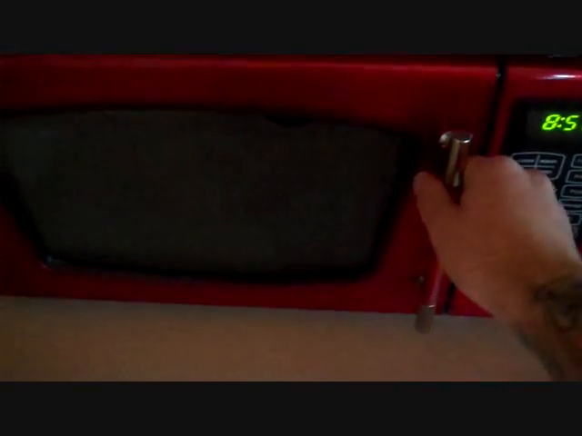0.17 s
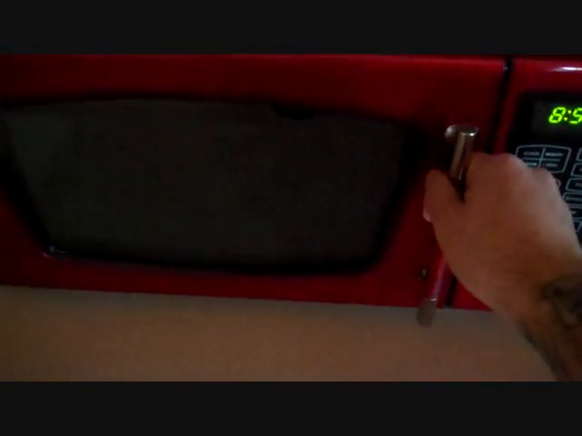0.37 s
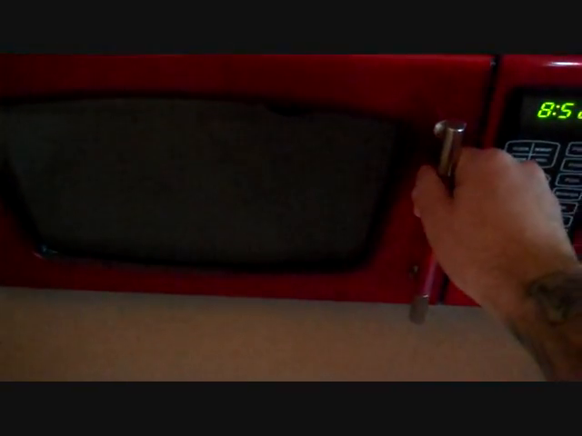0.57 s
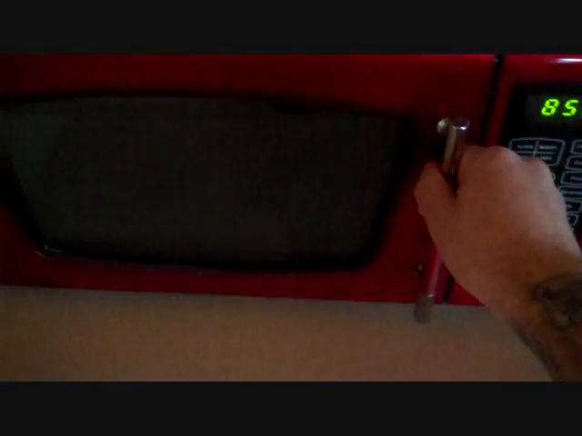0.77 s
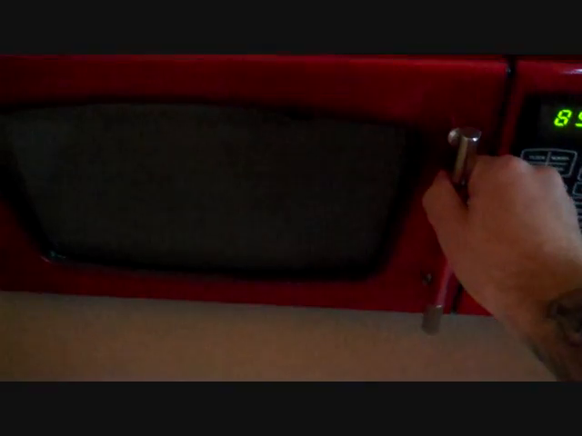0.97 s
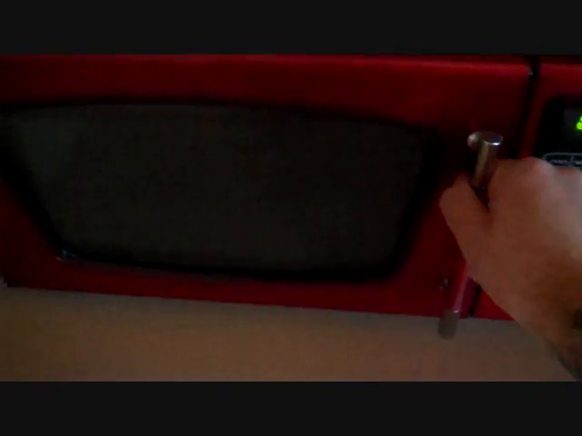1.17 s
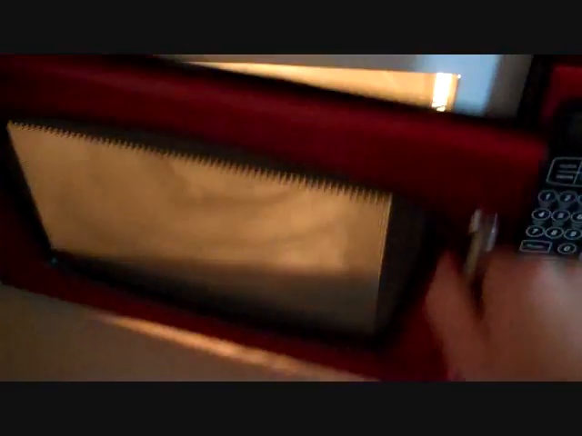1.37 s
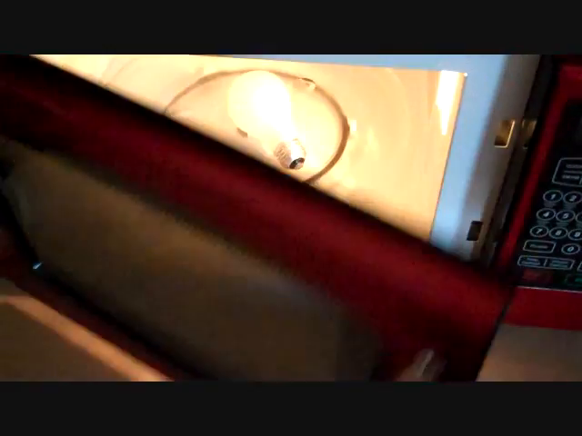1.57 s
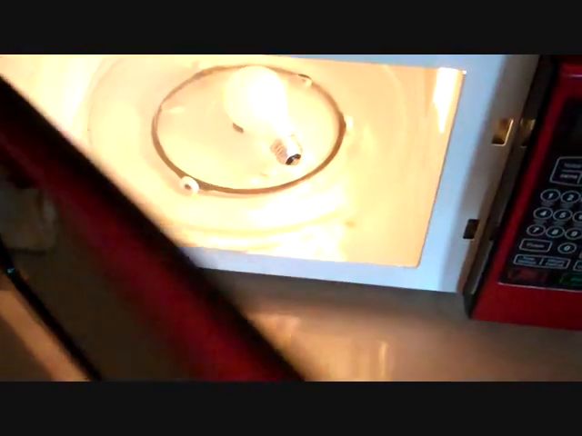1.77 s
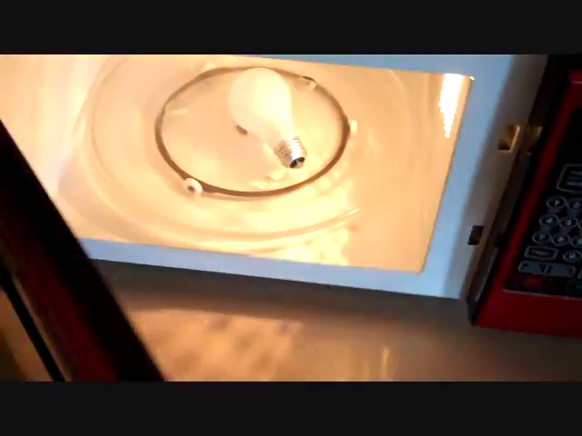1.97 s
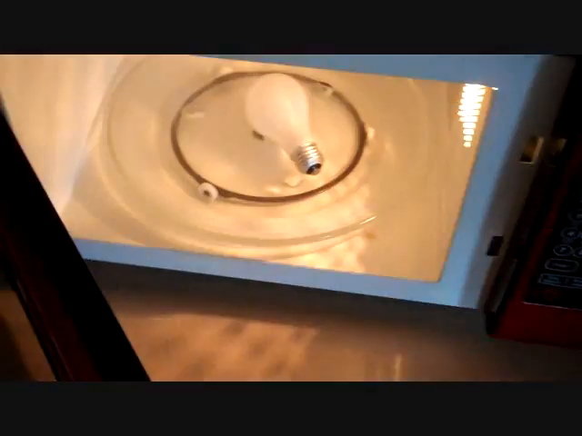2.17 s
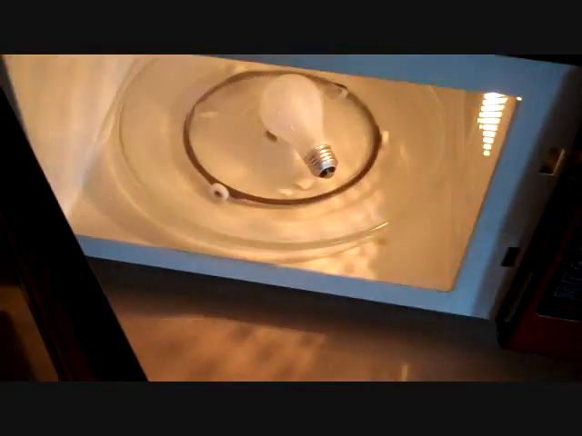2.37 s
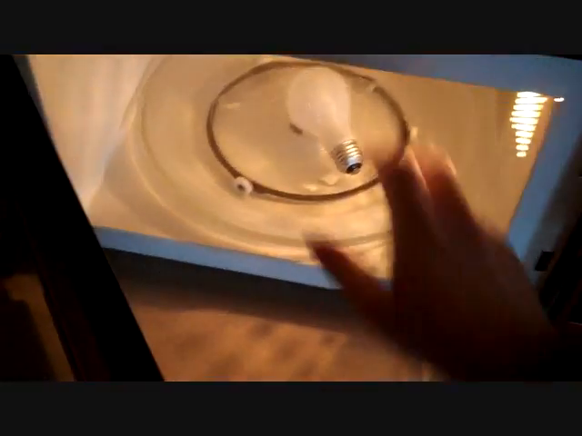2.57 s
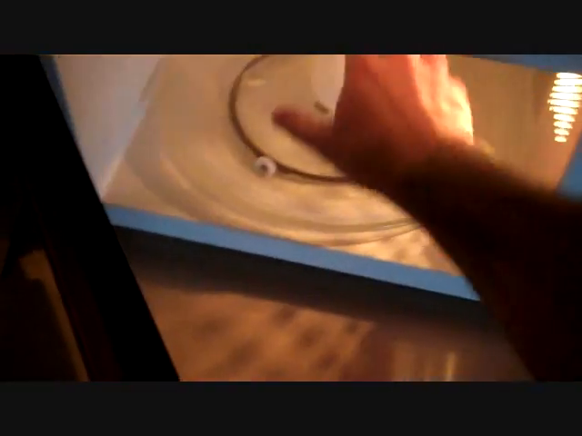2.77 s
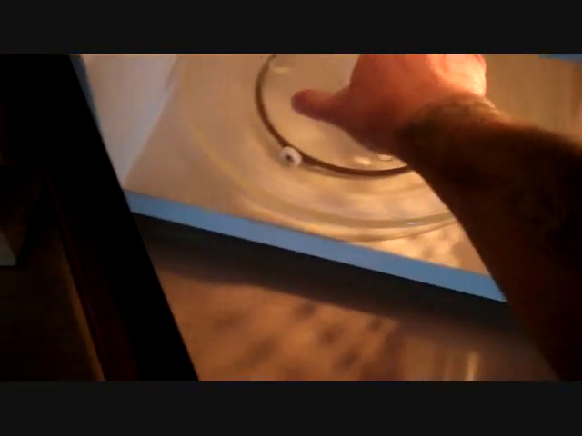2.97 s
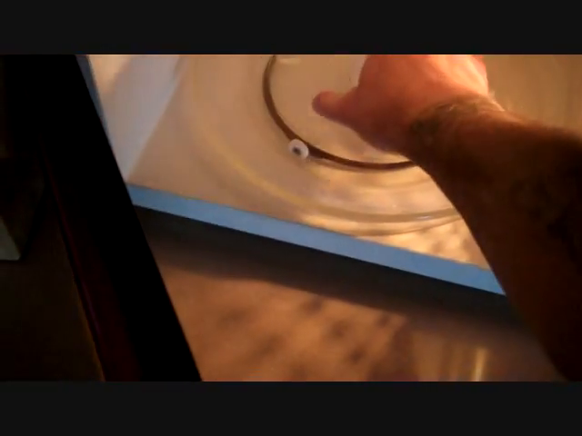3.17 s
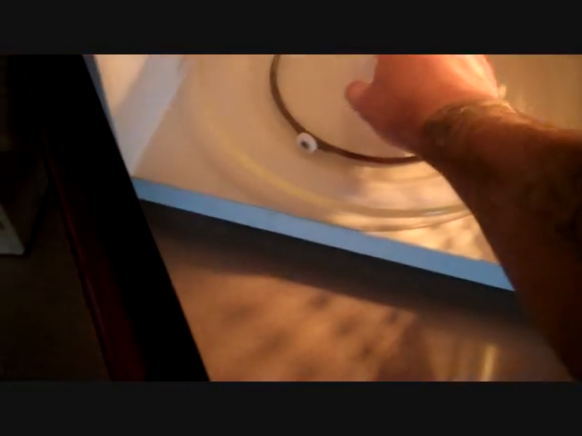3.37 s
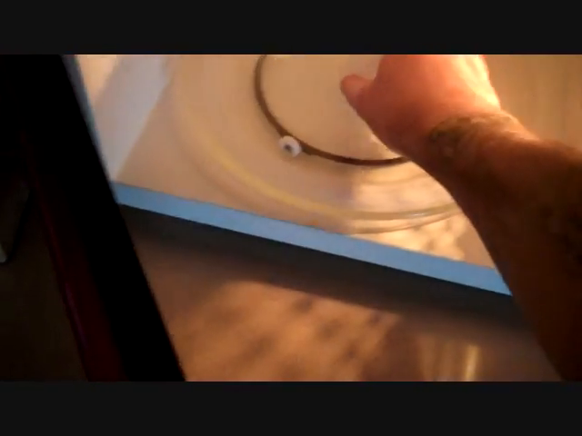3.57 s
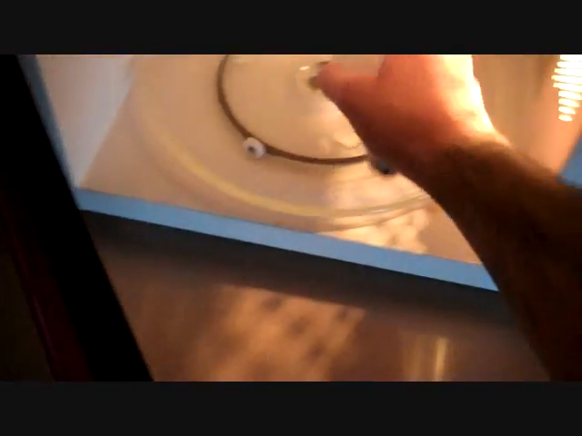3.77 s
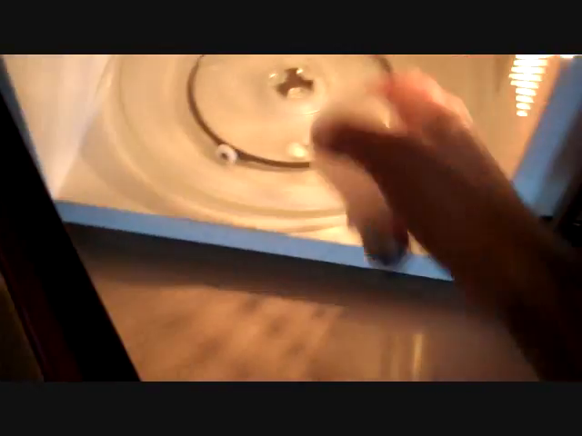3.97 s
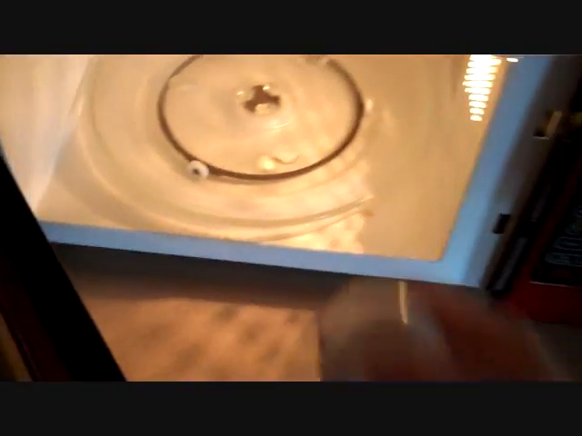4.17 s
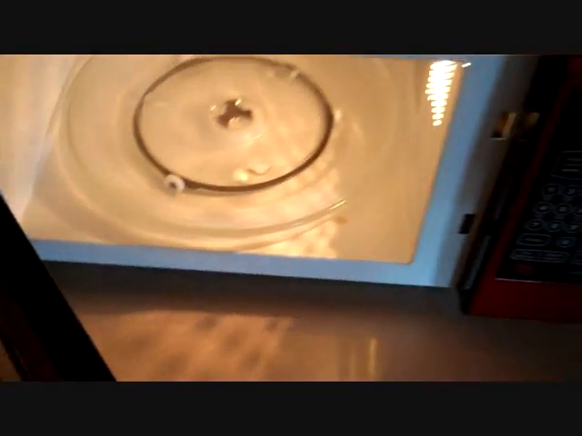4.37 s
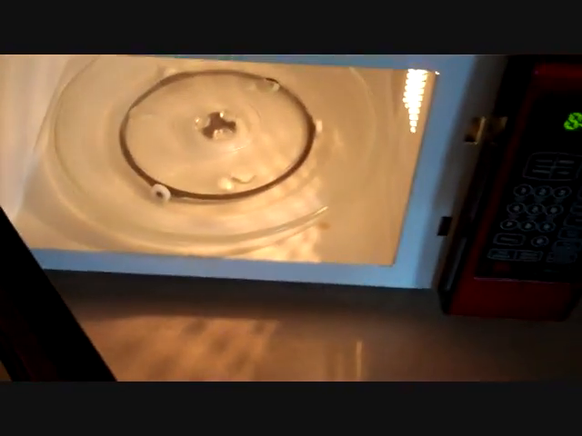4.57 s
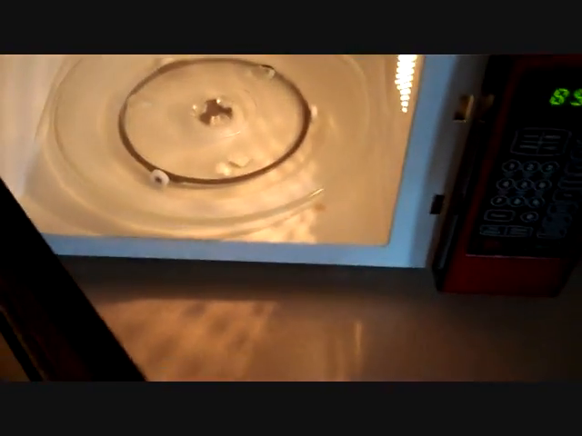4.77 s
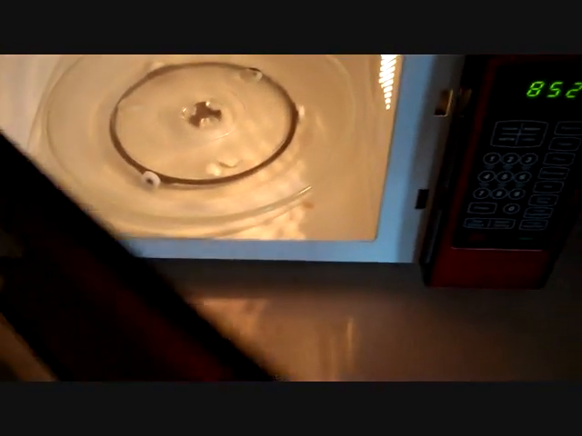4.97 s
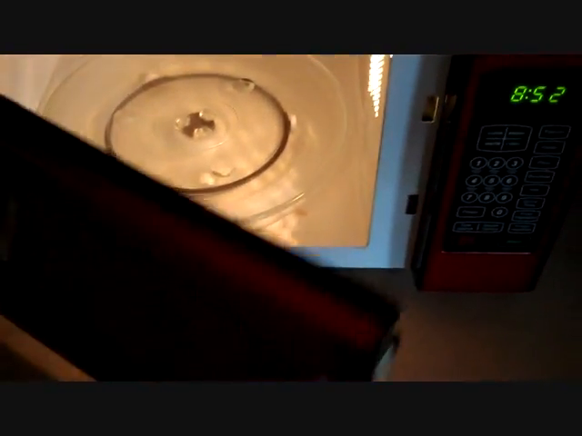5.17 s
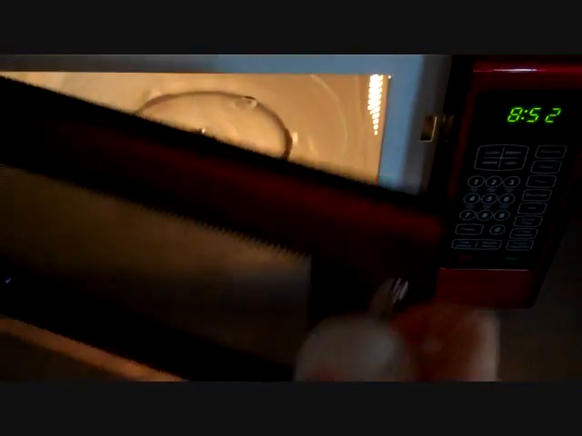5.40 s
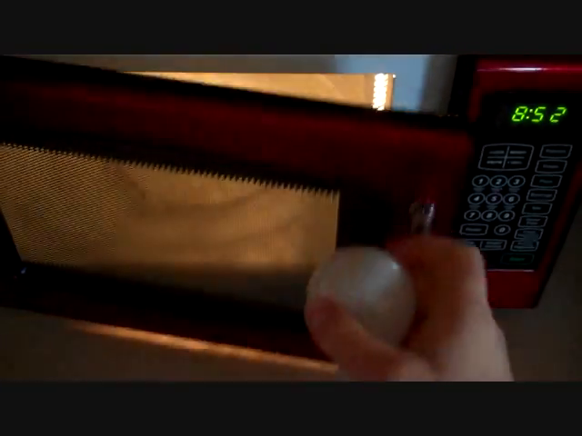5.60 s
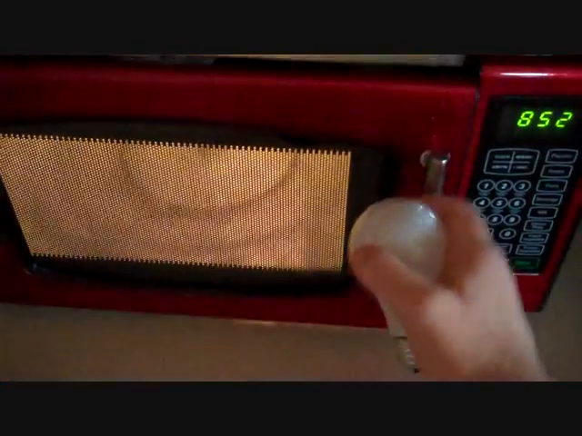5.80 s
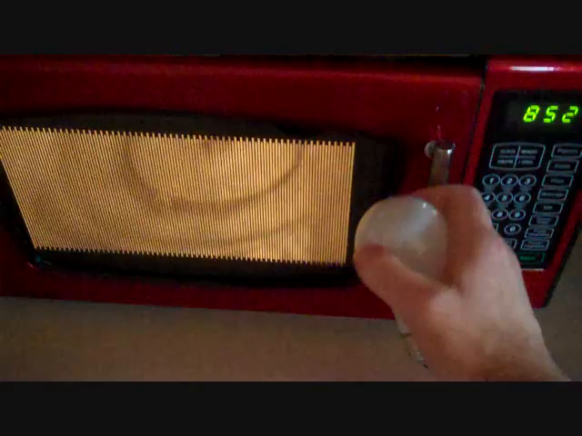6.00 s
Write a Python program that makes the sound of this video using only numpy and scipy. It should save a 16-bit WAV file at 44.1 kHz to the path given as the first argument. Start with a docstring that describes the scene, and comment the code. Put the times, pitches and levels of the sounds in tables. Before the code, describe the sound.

In a small, quiet kitchen, fingers knock on a microwave handle until the latch snaps free with a clunk. The metal case rings and the hinge ticks as the door opens. A light bulb scrapes and clinks on the glass turntable, then squeaks faintly in the fingers. The hinge spring twangs, and the door bumps shut with a quick bounce. Everything is close, louder on the left.

```python
"""In a small, quiet kitchen, fingers knock on a microwave oven's handle and pull until the latch snaps free.
The metal case rings, the latch spring sings faintly, and the hinge ticks as the door swings open.
An arm brushes in; a light bulb scrapes and knocks on the glass turntable, then chirps in the fingers.
The door swings back with its hinge spring twanging, bumps against the latch and bounces three times.
All of it is heard from close by, louder on the left than on the right."""
import sys
import numpy as np
from scipy import signal
from scipy.fft import rfft, irfft, next_fast_len
from scipy.io import wavfile

SR = 44100
rng = np.random.default_rng(int(sys.argv[2]) if len(sys.argv) > 2 else 0)


def to_wav(s):
    """Save 16-bit WAV."""
    ch = np.atleast_2d(s).T  # columns
    pcm = np.round(np.clip(ch, -1, 1) * 32767)  # PCM
    wavfile.write(sys.argv[1], SR, pcm.astype(np.int16))


N = 266275
TIME = np.arange(N) / SR


def undb(db):
    """Turn decibels into a number to multiply by."""
    return 10 ** (np.asarray(db) / 20)


def unit(x):
    """Scale x to an average power of 1."""
    return x / np.sqrt(np.mean(x ** 2))


def at_hz(points, hz):
    """Read between (Hz, value) points, with every octave equally wide."""
    f, value = np.transpose(points)
    return np.interp(np.log(hz), np.log(f), value)


def shape(x, gain):
    """Filter x: gain(f) says how much of each frequency to keep."""
    size = next_fast_len(len(x))
    hz = np.maximum(np.fft.rfftfreq(size, 1 / SR), 1)
    return irfft(rfft(x, size) * gain(hz), size)[:len(x)]


def band(x, lo_hz, hi_hz):
    """Keep one range of frequencies, with soft edges."""
    return shape(x, lambda f: 1 / np.sqrt((1 + (lo_hz / f) ** 8) * (1 + (f / hi_hz) ** 8)))


def low_cut(x, hz):
    """Remove the bass without blurring the start of a sound."""
    return signal.sosfilt(signal.butter(2, hz, "high", fs=SR, output="sos"), x)


def noise(colour, size):
    """Noise of power 1; its colour, in (Hz, dB) rows, says which frequencies are strong."""
    click = np.eye(1, size)[0]
    return unit(shape(click, lambda f: undb(at_hz(colour, f)) * np.exp(2j * np.pi * rng.random(len(f)))))


def fade(t60, size):
    """Die away by 60 dB in t60 seconds, the 'ring time'. 1 - fade(...) makes a smooth start."""
    return np.exp(-np.log(1000) * TIME[:size] / t60)


def ring(tones, size):
    """A struck object: fading tones from (Hz, dB, ring time) rows, scaled by their total power."""
    power = sum(undb(db) ** 2 for _, db, _ in tones) / 2
    waves = sum(undb(db) * fade(t60, size) * np.sin(2 * np.pi * (hz * TIME[:size] + rng.random()))
                for hz, db, t60 in tones)
    return waves * (1 - fade(0.0042, size)) / np.sqrt(power)


def add(out, start, x):
    """Mix x into out, beginning at start seconds."""
    i = max(int(start * SR), 0)
    out[i:i + len(x)] += x[:N - i]


# The colour of the quiet room. Each row: frequency in Hz, relative level in dB.
AIR_COLOUR = [(15, -68.5), (25, -11.5), (130, -12), (166, -7.5), (216, -3.5), (297, -3.5), (409, -6.5),
              (443, -0.5), (549, -7), (697, -5), (886, -7.5), (1430, -9), (6520, -14.5), (14500, -22.5)]

def kitchen_air(level_db=-59.5):
    """The air of the kitchen: a faint, steady rush."""
    return undb(level_db) * noise(AIR_COLOUR, N)


# How long the echo lasts. Each row: frequency in Hz, ring time in seconds.
ECHO_TIMES = [(100, 0.67), (400, 0.73), (1000, 0.8), (3000, 0.15), (8000, 1), (14000, .25)]
# How strong the echo is. Each row: frequency in Hz, relative level in dB.
ECHO_LEVELS = [(80, -4.5), (400, -1), (1000, -12.5), (3000, -9), (8000, -24), (14000, -10)]

def kitchen_echo(x, size=SR):
    """Hard walls throw x back: the echo builds quickly, and each octave fades at its own pace."""
    tail, white = np.zeros(size), rng.standard_normal(size)
    for hz in 62.5 * 2. ** np.arange(9):
        decay = fade(at_hz(ECHO_TIMES, hz), size) * (1 - fade(0.023, size))
        octave = shape(white, lambda f: np.maximum(1 - np.abs(np.log2(f / hz)), 0))
        tail += undb(at_hz(ECHO_LEVELS, hz)) * octave * decay / np.linalg.norm(decay)
    return signal.fftconvolve(x, tail)[:N]


# The colour of the brushing arm. Each row: frequency in Hz, relative level in dB.
BRUSH_COLOUR = [(1500, -12.5), (5000, -22.5), (8000, 3), (10000, -16.5), (14000, -23.5)]
# Tiny squeaks. Each row: start in seconds, pitch in Hz, relative level in dB, length in seconds.
FINGER_CHIRPS = [(3.883, 6820, -61.5, 0.096), (3.978, 7310, -59.5, 0.09), (3.996, 5270, -65.5, 0.071),
                 (4.251, 6640, -59, 0.063)]

def hand(brush_s=2.813, brush_width_s=0.23, brush_db=-57):
    """The arm brushes into the oven in one swell; later the bulb chirps faintly in the fingers."""
    swell = np.exp(-((TIME - brush_s) / brush_width_s) ** 2)
    out = undb(brush_db) * swell * noise(BRUSH_COLOUR, N)
    for start, hz, db, length in FINGER_CHIRPS:
        size = int(length * SR)
        squeak = shape(rng.standard_normal(size), lambda f: 1 / (1 + ((f - hz) / 220) ** 2))
        add(out, start, undb(db + 6.5) * unit(squeak) * np.hanning(size))
    return out


def latch_spring(start=1.335, hz=5835, beat_hz=7.15, level_db=-46):
    """The spring sings as the door comes free: two close tones that waver against each other."""
    out = np.zeros(N)
    tone = np.sin(2 * np.pi * hz * TIME)
    twin = undb(-8) * np.sin(2 * np.pi * (hz + beat_hz) * TIME)
    add(out, start, undb(level_db) * (tone - twin) * fade(t60=2.2, size=N))
    return out


# The colour of one hinge tick. Each row: frequency in Hz, relative level in dB.
TICK_COLOUR = [(240, -21), (400, -15.5), (517, -22), (781, -8.5), (1180, -11.5), (1940, -6), (3100, -11),
               (3840, -13), (7720, -13), (12000, -44), (15600, -65), (22000, -120)]
# The door opens fast, then slower. Each row: time in seconds, ticks per second, relative level in dB.
DOOR_SWING = [(1.507, 25.2, -42.5), (1.75, 25.2, -42.5), (1.78, 18.1, -41), (1.9, 18.1, -42),
              (1.95, 18.1, -35), (2.065, 18.1, -35.5), (2.11, 18.1, -60), (2.19, 18.1, -53)]

def hinge(size=8192):
    """The hinge slips at a rate that follows the swing; each tick rattles briefly through the door."""
    out = np.zeros(N)
    times, rates, levels = np.transpose(DOOR_SWING)
    envelope = fade(0.23, size) * (1 - fade(0.0041, size))
    now = times[0]
    while now < times[-1]:
        db = np.interp(now, times, levels)
        add(out, now, undb(db - 5.5) * noise(TICK_COLOUR, size) * envelope)
        now += 1 / np.interp(now, times, rates)
    return out


# The colour of a twang. Each row: frequency in Hz, relative level in dB.
TWANG_COLOUR = [(60, -28), (130, -10), (230, -6.5), (330, -14), (480, 0), (600, -11), (900, -7.5),
                (1400, -9.5), (1900, -7.5), (3100, -20), (8000, -26), (10000, -36.5), (14500, -48)]
# Pitches that stand out in a twang. Each row: frequency in Hz, width in Hz, boost in dB.
TWANG_PEAKS = [(244.6, 12.8, 16.5), (1006, 26, 18), (1335, 136, 6), (7810, 1220, 12.5)]
# The spring's coils slip as the door closes.
# Each row: start in seconds, relative level in dB, bass change in dB, delay at 1000 Hz in seconds.
COIL_SLIPS = [(4.8425, -30, -1, 0.0021), (5.1978, -42, -3, 0.0031), (5.33, -17.5, -20, .0015)]

def hinge_spring(size=16384):
    """Low waves travel along the spring more slowly, so each slip is a twang that falls in pitch."""
    out = np.zeros(N)
    for start, db, bass_db, lag in COIL_SLIPS:
        def spring(f):
            delay = lag * (1000 / np.maximum(f, 220)) ** 1.8
            peaks = 1 + sum((undb(boost_db) - 1) / (1 + 2j * (f - hz) / width)
                            for hz, width, boost_db in TWANG_PEAKS)
            colour = at_hz(TWANG_COLOUR, f) + bass_db / (1 + (f / 350) ** 4)
            return undb(colour) * peaks * np.exp(-2j * np.pi * np.cumsum(delay) * SR / size)
        slip = undb(-12.5) * rng.standard_normal(size) * fade(0.072, size)  # scatter inside the door
        slip[0] += 1  # the click of the slip itself
        twang = unit(shape(slip, spring)) * np.linspace(1, 0, size) ** 2
        add(out, start, undb(db - 14.5) * twang)
    return out


# The tones of turntable and bulb. Each row: pitch in Hz, relative level in dB when struck,
# relative level in dB when rubbed, ring time in seconds when struck.
GLASS_TONES = [(685.3, -20, -17.5, 0.23), (829, -15.5, -6.5, 0.06), (934, -9, -15.5, 0.17),
               (1039, -3, 4.5, 0.1062), (1120, -6, -9, 0.29), (1242, -1.5, -0.5, 0.075),
               (1720, -5.5, -12, 0.16), (1944, 3, -7, 0.14), (2069, 5, -2, 0.092), (2610, -7, -31.5, 0.12),
               (2701, -10.5, -22.5, 0.11), (2943, 5, -5, 0.052), (3337, 3.5, -11, 0.04),
               (3548, -24, -24.5, 0.065), (4080, -19, -18.5, 0.11), (4630, -9, -20.5, .055),
               (5295, -7.5, -7, 0.081), (5486, -7.5, -24.5, 0.063), (6000, -38.5, -25.5, 0.093),
               (6340, -33.5, -16, 0.062), (7027, -2.5, -14, 0.16), (7370, -17, -12, 0.084),
               (7693, -10.5, -33, 0.37), (8210, -12.5, -29.5, 0.15), (10000, -20, -26.5, 0.079),
               (12600, -38.5, -42.5, .08)]
# The colour of glass touching glass. Each row: frequency in Hz, relative level in dB.
CLINK_COLOUR = [(170, -36), (380, 0.5), (540, -28.5), (850, 4), (1200, 10), (1500, -12), (2100, 3),
                (3300, -8.5), (4200, -12.5), (8200, -6.5), (10500, -34), (14000, -69.5)]
# The bulb slides over the turntable. Each row: time in seconds, relative level in dB.
BULB_SLIDE = [(3.21, -73), (3.24, -35.5), (3.306, -22), (3.326, -34), (3.43, -57.5)]
# The bulb knocks on the turntable. Each row: start in seconds, relative level in dB.
BULB_KNOCKS = [(3.236, -54), (3.445, -52), (3.4772, -17.5), (3.484, -18.5), (3.4972, -23.5)]

def bulb(slips_per_s=1500, size=22050):
    """Glass sticks and slips on glass while the bulb slides, then it knocks and bounces."""
    struck = [(hz, db, t60) for hz, db, _, t60 in GLASS_TONES]
    rubbed = [(hz, db, t60 * 0.69) for hz, _, db, t60 in GLASS_TONES]  # the fingers shorten the ring
    slips = unit(rng.standard_normal(N) * (rng.random(N) < slips_per_s / SR))
    times, levels = np.transpose(BULB_SLIDE)
    slide = undb(np.interp(TIME, times, levels, left=-200, right=-200))
    rub = ring(rubbed, size) + undb(-11) * noise(CLINK_COLOUR, size) * fade(0.041, size)
    out = undb(2.5) * signal.fftconvolve(slips * slide, rub / np.linalg.norm(rub))[:N]
    for start, db in BULB_KNOCKS:
        tones = undb(9.5) * ring(struck, size)
        clink = undb(-3.5) * noise(CLINK_COLOUR, size) * fade(0.16, size)
        add(out, start, undb(db) * (tones + clink))
    return low_cut(out, hz=420)  # small things give off no bass


# The tones of the metal case and the space inside it.
# Each row: pitch in Hz, relative level in dB, ring time in seconds.
CASE_TONES = [(78, -10, .2), (153.8, -8.5, 0.41), (169.4, -8.5, 0.39), (238, -19.5, .9), (386, -12.5, 2.0),
              (420, -7.5, 0.87), (451.7, 2.5, 0.1), (673, -20, 0.47), (808, -3, 0.34), (937, -2.5, 0.3),
              (1053, -4, 0.31), (1580, 2, 0.2), (2000, -20, .8)]

def case_ring(jolts, unlatch_s=1.285, latched_t60=0.37):
    """Every jolt rings the case: briefly while the latched door presses on it, longer from then on."""
    latched = TIME < unlatch_s
    damped = [(hz, db, min(t60, latched_t60)) for hz, db, t60 in CASE_TONES]
    short_ring = signal.fftconvolve(jolts * latched, ring(damped, SR))[:N]
    long_ring = signal.fftconvolve(jolts * ~latched, ring(CASE_TONES, 2 * SR))[:N]
    return undb(-8) * short_ring + undb(-10) * long_ring


# The colour of the plastic door. Each row: frequency in Hz, relative level in dB.
PLASTIC_COLOUR = [(24, -62), (40, -40.5), (124, -3.5), (214, -16.5), (437, -3.5), (507, -10), (771, 1),
                  (1330, -0.5), (1660, 1), (2850, -8.5), (3300, -6), (4440, -9), (8020, -1.5), (10300, -19),
                  (14500, -26.5)]
# The latch's hooks and catch. Each row: pitch in Hz, relative level in dB, ring time in seconds.
LATCH_TONES = [(2910, -16.5, 0.051), (2975, -2.5, 0.023), (3350, 3.5, .07), (3700, 1.5, 0.24),
               (4220, 2, 0.083), (5160, -5, 0.28), (7380, 0, .08), (7660, 15, 0.16), (8200, 13, .09)]

def blow(bass_db, hardness, size=16384):
    """A thud, a clatter and a snap. Hardness runs from 0 (skin on plastic) to 1 (hook on catch)."""
    # The harder the blow, the brighter it is, the quicker it starts and the sooner it ends.
    treble_db = -11 + 29 * hardness
    rise_s = 0.032 * (0.00054 / 0.032) ** hardness
    t60 = 0.26 * (0.045 / 0.26) ** hardness
    plastic = noise(PLASTIC_COLOUR, size)
    thud = unit(band(plastic, 50, 478)) * fade(0.93 * t60, size) * (1 - fade(0.014, size))
    clatter = unit(band(plastic, 680, 3700)) * fade(t60, size)
    crack = unit(band(plastic, 3000, 14000)) * fade(0.6 * t60, size)
    tick = undb(-3.5) * low_cut(rng.standard_normal(size), 2450) * fade(0.0033, size)
    snap = crack + tick + undb(-14.5) * ring(LATCH_TONES, size)
    push = 1 - fade(rise_s, size)
    return push * (undb(bass_db) * thud + clatter + undb(treble_db) * snap)


# Loose parts chatter under the grip, as the hooks strain, and once the door is free.
# Each row: start in seconds, end in seconds, relative level in dB, hardness from 0 to 1.
LOOSE_PARTS = [(0.358, 0.44, -45, .4), (1.299, 1.321, -33.5, 1), (1.388, 1.436, -34, 0.23)]

def chatter(count=4, bass_db=-4.5):
    """Loose parts give small blows at uneven moments, listed as rows like DOOR_BLOWS."""
    rows = []
    for start, end, db, hardness in LOOSE_PARTS:
        for k in range(count):
            moment = start + (end - start) * (k + rng.random()) / count
            rows.append((moment, db + 2 * rng.standard_normal(), bass_db, hardness))
    return rows


def bounces(start=5.924, gap_s=0.039, loss_db=6, bass_db=-5.5, dulling=0.54):
    """The closed door bounces evenly, weaker and duller each time, listed as rows like DOOR_BLOWS."""
    return [(start + k * gap_s, -29.5 - k * loss_db, bass_db, 0.38 * dulling ** k) for k in range(3)]


# Fingers knock on the handle, the hooks drag and snap free, and at last the door bumps back.
# Each row: start in seconds, relative level in dB, bass change in dB, hardness from 0 to 1.
DOOR_BLOWS = [(0.001, -50, 6, 0.63), (0.0751, -44, 0.5, 0.95), (0.135, -52.5, -8, 0.6),
              (0.329, -35.5, -13.5, 0.33), (0.3519, -28, -5.5, 0.56), (0.45, -33.5, -19, 0.04),
              (0.483, -30.5, -8.5, 0.03), (0.561, -33, -7.5, 0.16), (0.911, -39, 2.5, 0.36),
              (1.014, -37.5, -22.5, 0.33), (1.034, -37, -5, 0.2), (1.248, -38, -1.5, 0.34),
              (1.269, -28, 1.5, .35), (1.289, -29, -0.5, .9), (1.293, -27.5, -7, 1),
              (1.325, -14.5, -16, 0.96), (1.331, -14, -10.5, 0.31), (1.364, -16, -17.5, 0.42),
              (1.382, -16.5, -4.5, 0.31), (5.8859, -30, -20, 0.73), (5.889, -12.5, -15.5, 0.25)]

def door():
    """Each blow sounds the door and its latch, and its bass jolts the metal case."""
    out, jolts = np.zeros(N), np.zeros(N)
    for start, db, bass_db, hardness in DOOR_BLOWS + bounces() + chatter():
        add(out, start, undb(db - 2.5) * blow(bass_db, hardness))
        add(jolts, start, undb([db + bass_db]))
    return out + case_ring(jolts)


def right_side(x, scatter_hz, size=2048):
    """What the right microphone hears of x: the same bass, but more scattered above scatter_hz."""
    def share(f):
        return 1 / (1 + (scatter_hz / f) ** 1.5)
    scatter = rng.standard_normal(size) * fade(0.07, size)
    stray = signal.fftconvolve(x, scatter / np.linalg.norm(scatter))[:N]
    return shape(x, lambda f: np.sqrt(1 - share(f))) + shape(stray, lambda f: np.sqrt(share(f)))


# How much weaker the right microphone is than the left. Each row: frequency in Hz, change in dB.
RIGHT_LOSS = [(60, -7.5), (1000, -8), (3000, -8.5), (6500, -9.5), (7800, -22), (14000, -24)]

def scene():
    """The oven, the bulb and the room around them reach two close microphones."""
    sources = [door(), hinge() + latch_spring(), bulb() + hand()]
    twangs = hinge_spring()
    # The hinge spring is close by, so a little less of it goes round the room.
    room = kitchen_echo(sum(sources) + undb(-1.5) * twangs) + kitchen_air()
    left = sum(sources) + twangs + room
    right = sum(right_side(x, scatter_hz=5000) for x in sources + [twangs])
    right += right_side(room, scatter_hz=1800)
    return np.array([left, shape(right, lambda f: undb(at_hz(RIGHT_LOSS, f)))])


def record(dry, hiss_db=-64.5, top_hz=14400):
    """Add a faint hiss, round off the loudest peaks and cut the highest treble."""
    hissy = dry + undb(hiss_db) * rng.standard_normal(dry.shape)
    rounded = 0.9 * np.tanh(hissy / 0.9)
    return signal.sosfilt(signal.ellip(10, 0.2, 70, top_hz, fs=SR, output="sos"), rounded)


dry = scene()
out = record(dry)
to_wav(out)
```